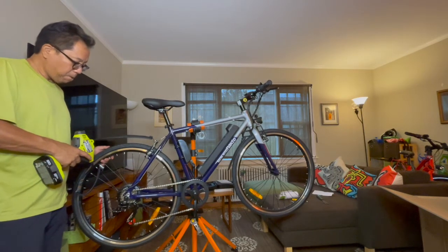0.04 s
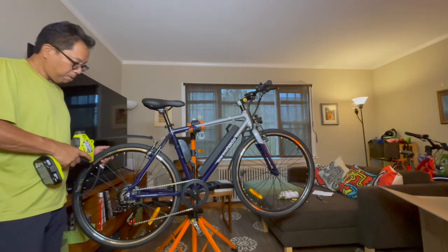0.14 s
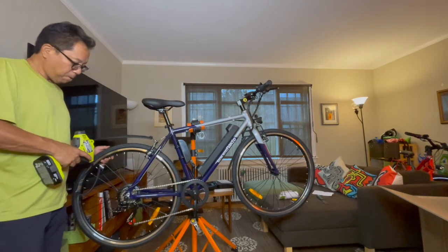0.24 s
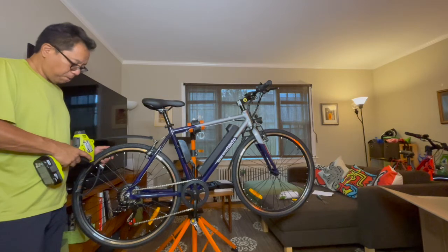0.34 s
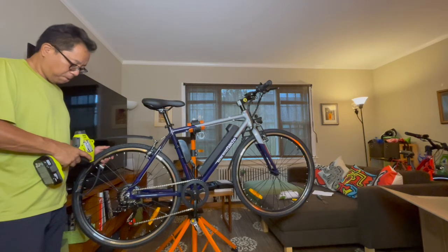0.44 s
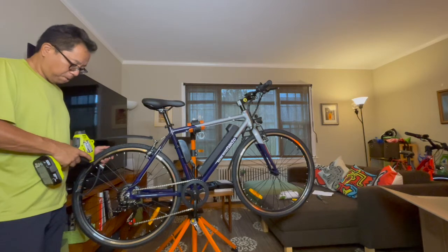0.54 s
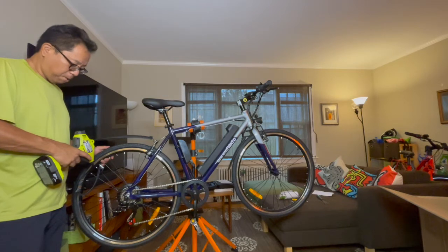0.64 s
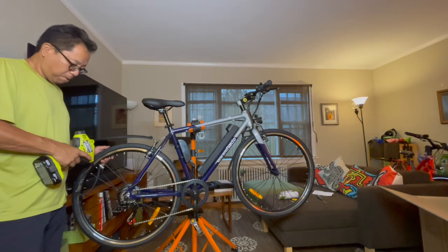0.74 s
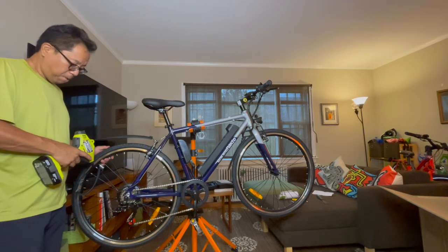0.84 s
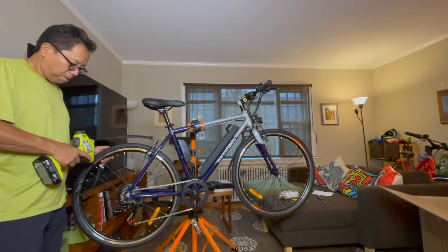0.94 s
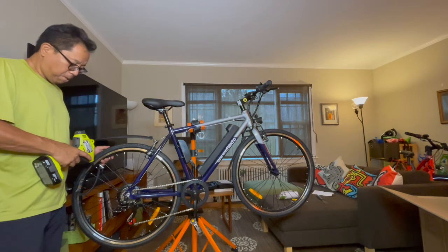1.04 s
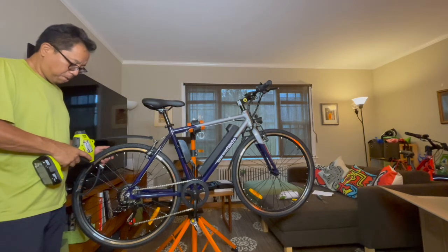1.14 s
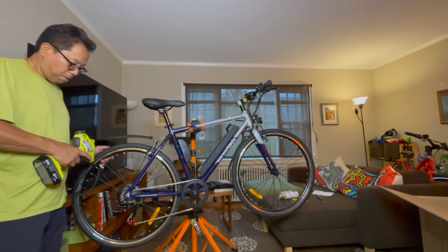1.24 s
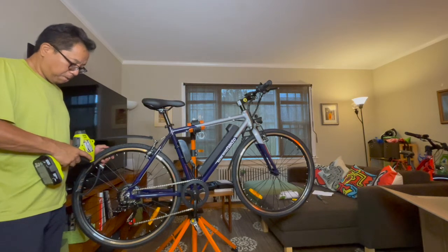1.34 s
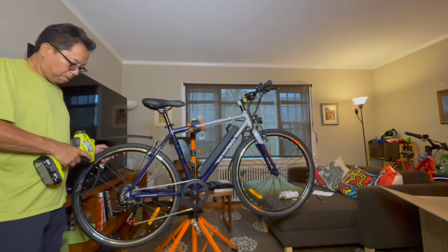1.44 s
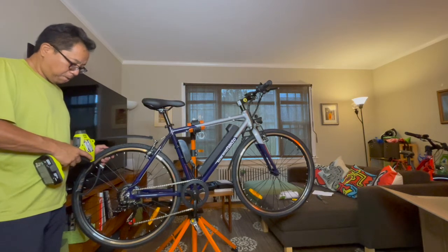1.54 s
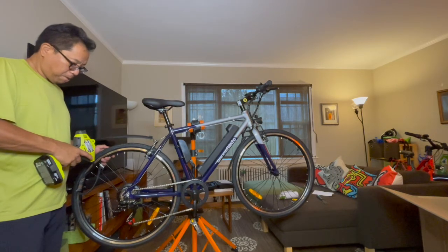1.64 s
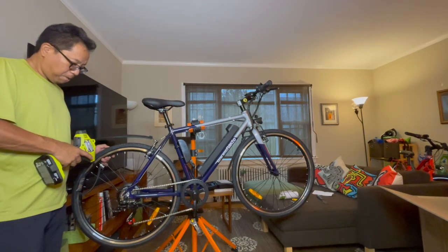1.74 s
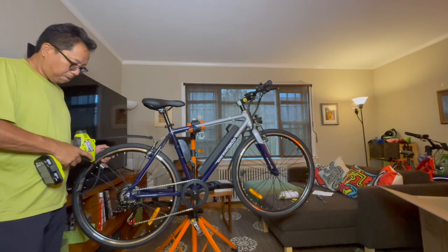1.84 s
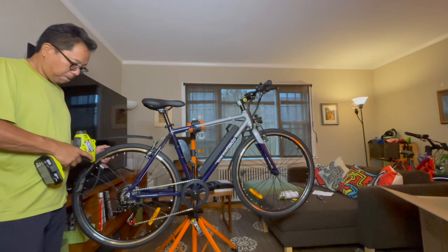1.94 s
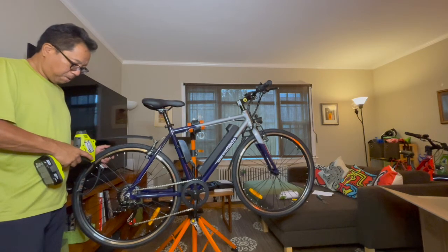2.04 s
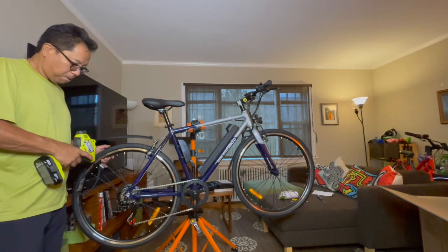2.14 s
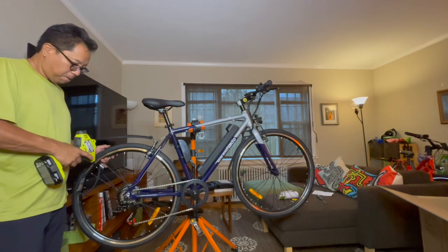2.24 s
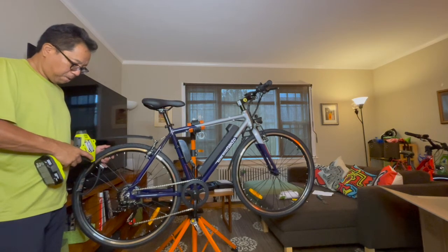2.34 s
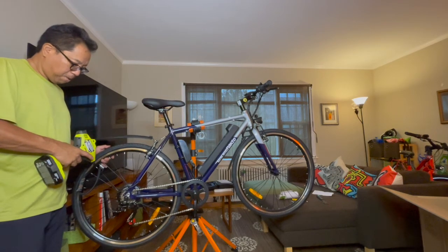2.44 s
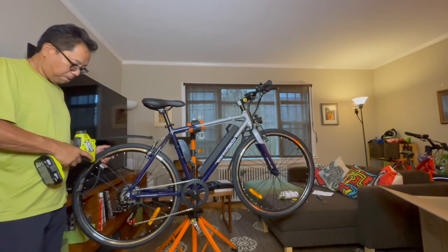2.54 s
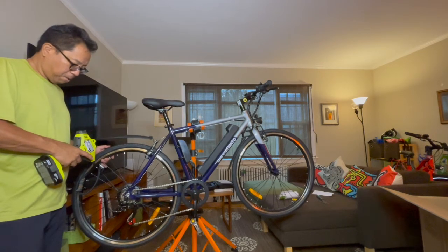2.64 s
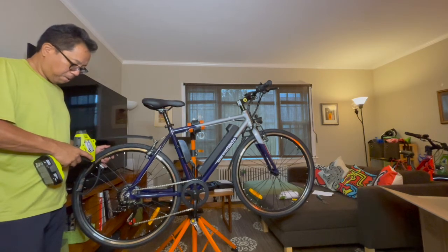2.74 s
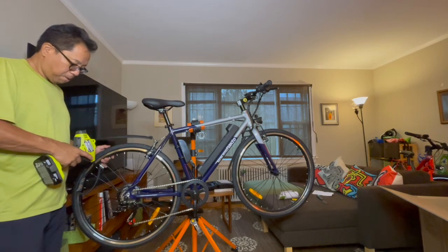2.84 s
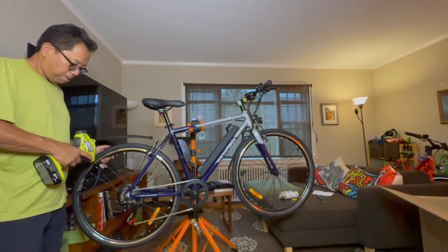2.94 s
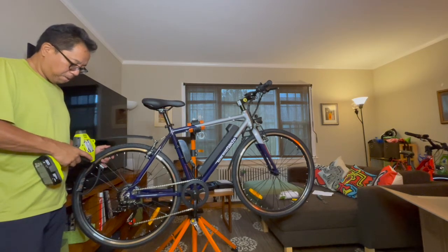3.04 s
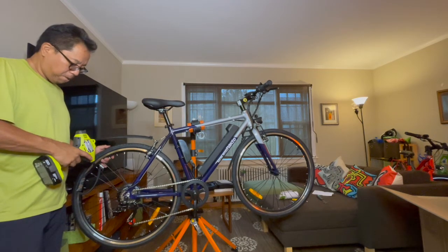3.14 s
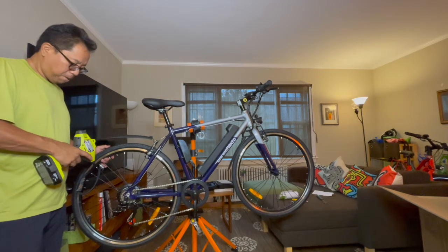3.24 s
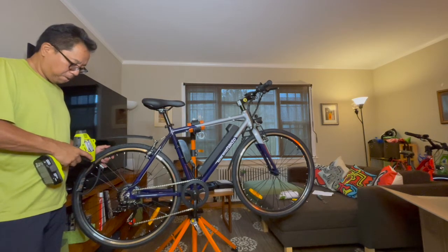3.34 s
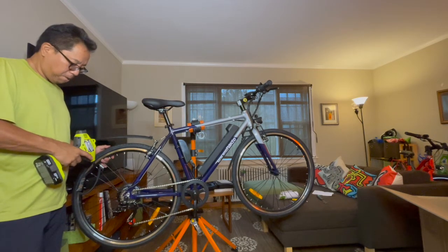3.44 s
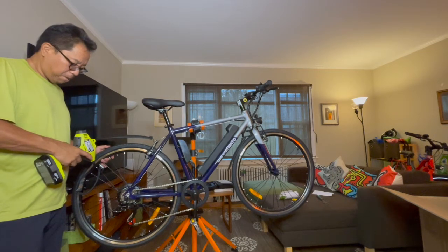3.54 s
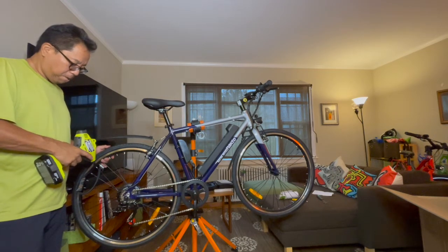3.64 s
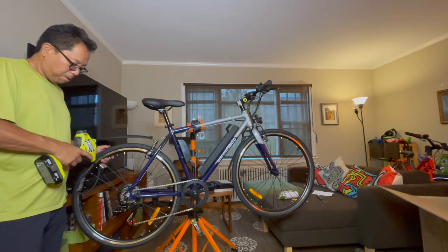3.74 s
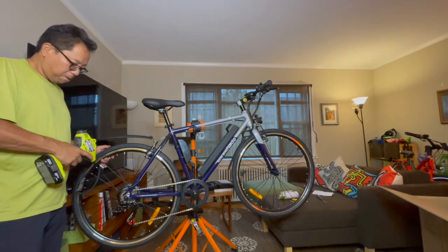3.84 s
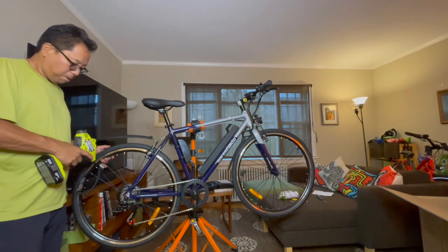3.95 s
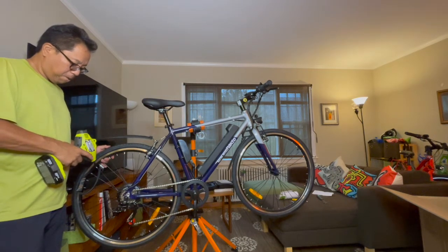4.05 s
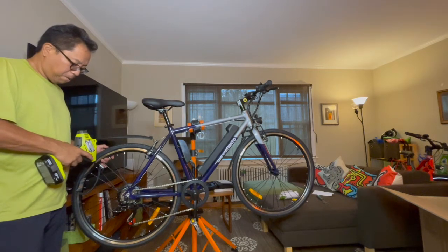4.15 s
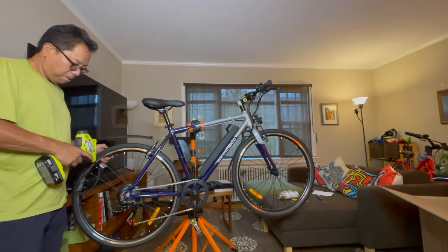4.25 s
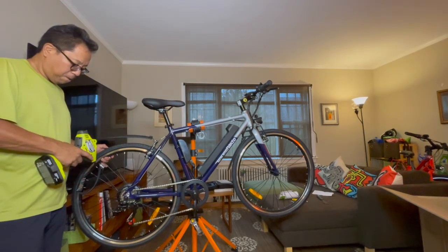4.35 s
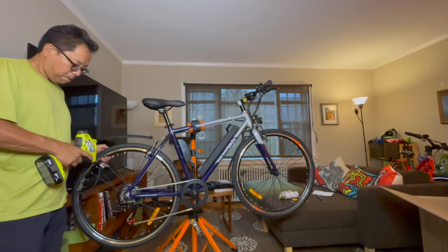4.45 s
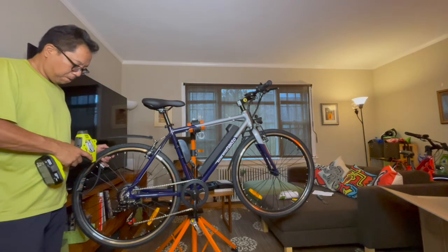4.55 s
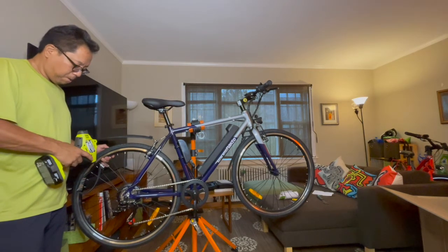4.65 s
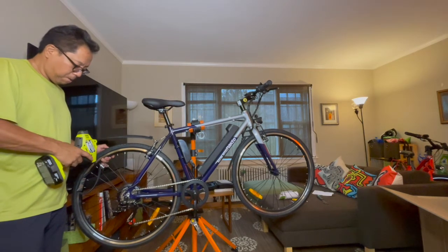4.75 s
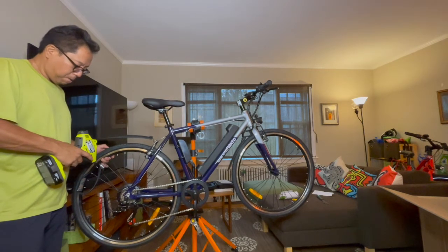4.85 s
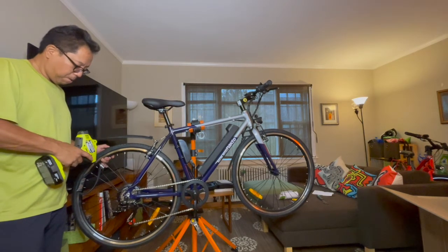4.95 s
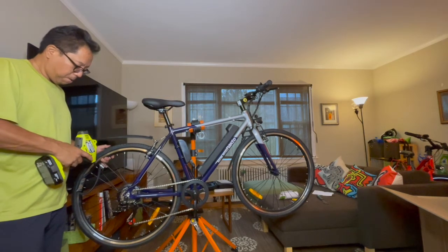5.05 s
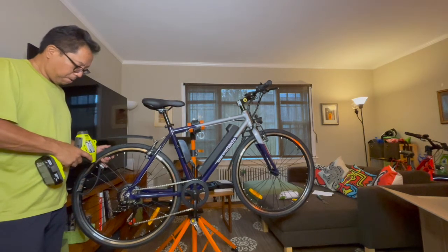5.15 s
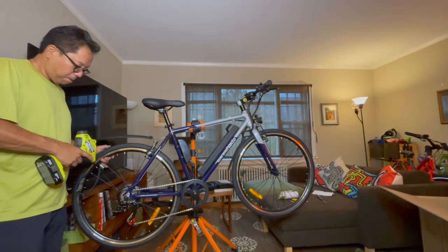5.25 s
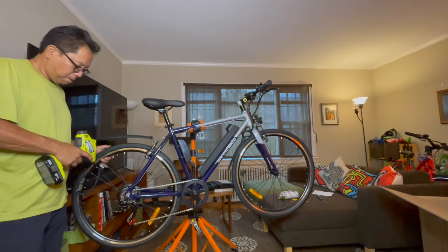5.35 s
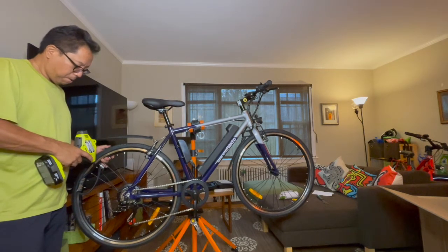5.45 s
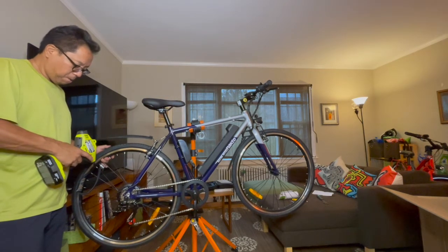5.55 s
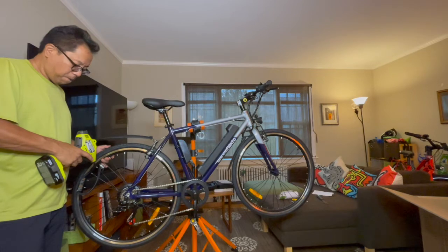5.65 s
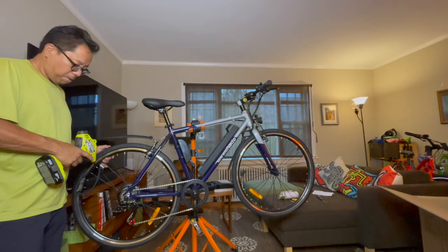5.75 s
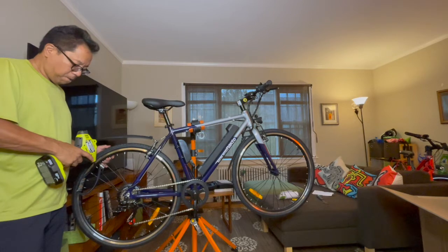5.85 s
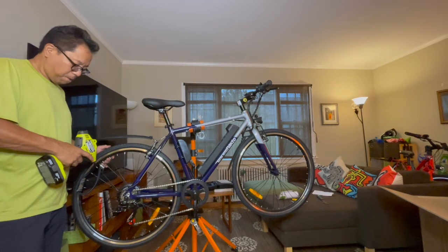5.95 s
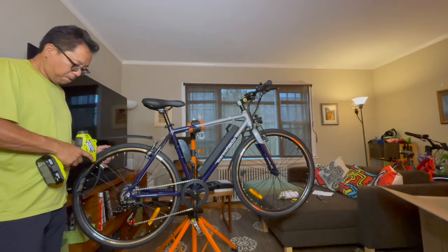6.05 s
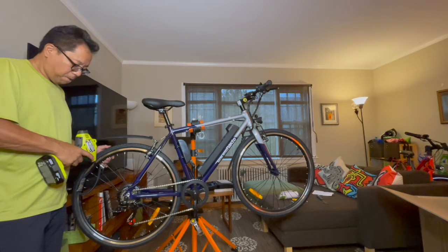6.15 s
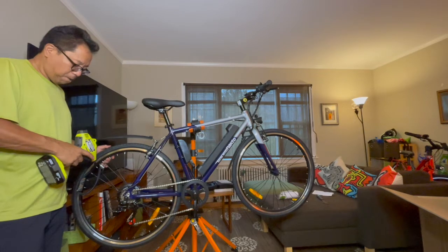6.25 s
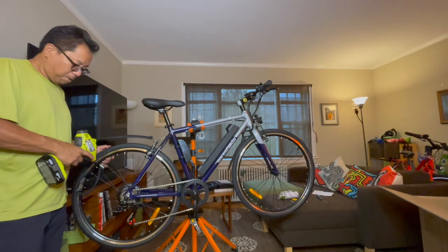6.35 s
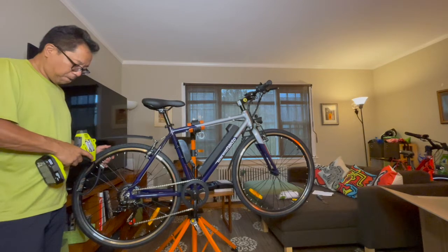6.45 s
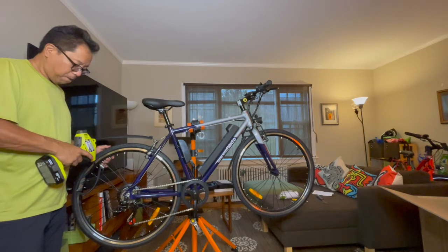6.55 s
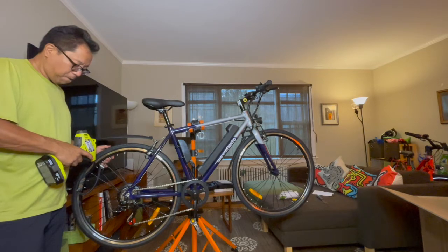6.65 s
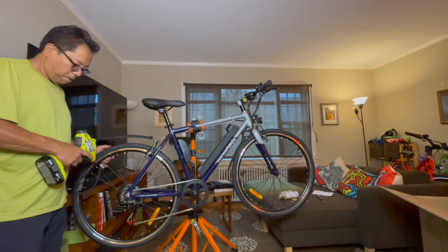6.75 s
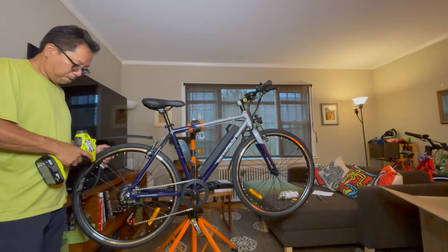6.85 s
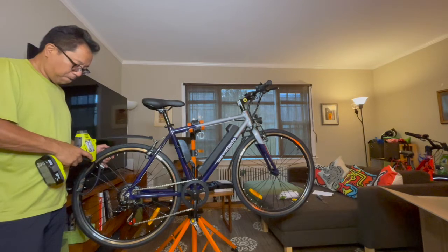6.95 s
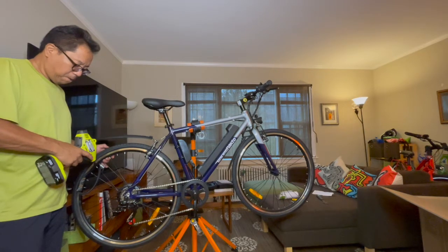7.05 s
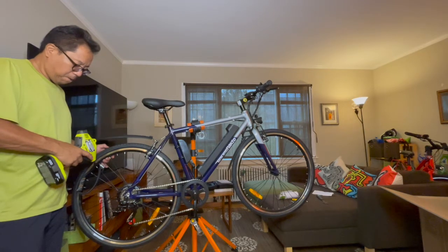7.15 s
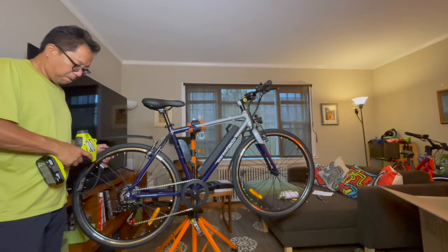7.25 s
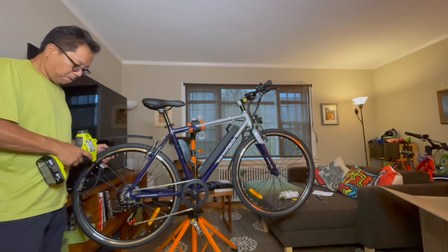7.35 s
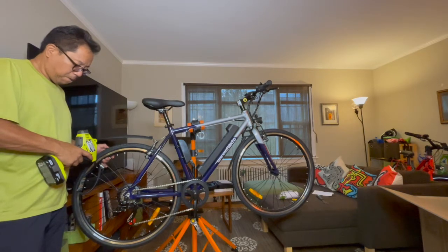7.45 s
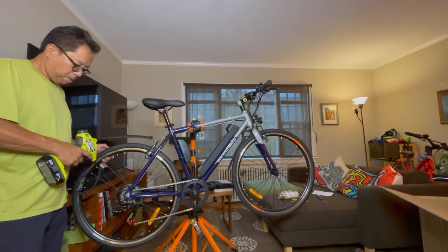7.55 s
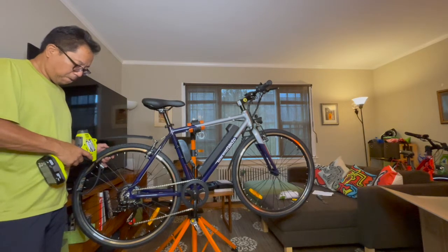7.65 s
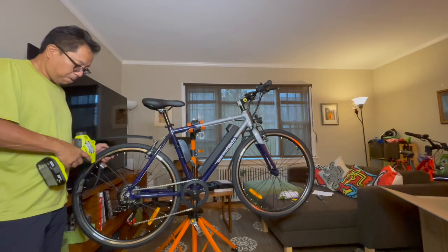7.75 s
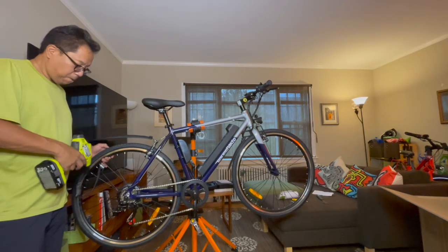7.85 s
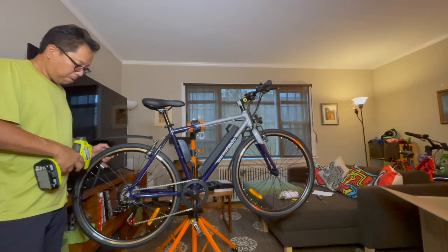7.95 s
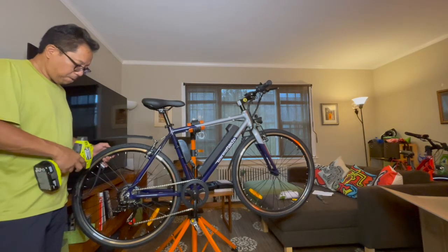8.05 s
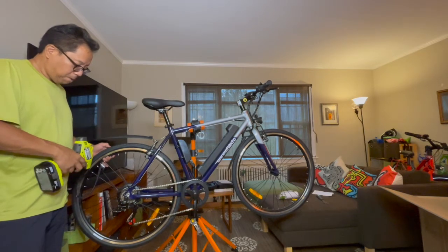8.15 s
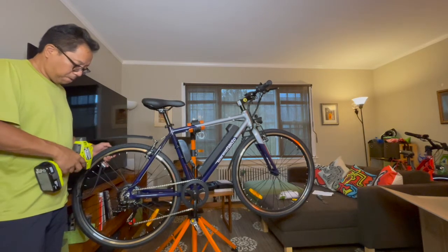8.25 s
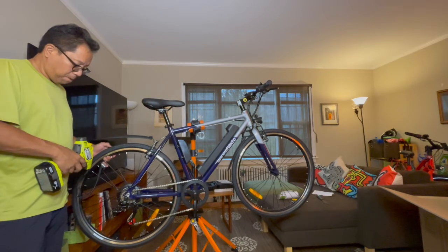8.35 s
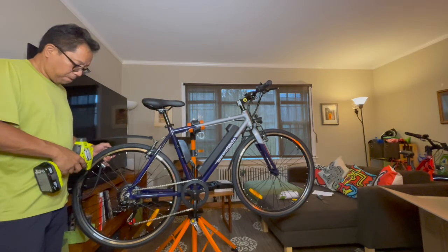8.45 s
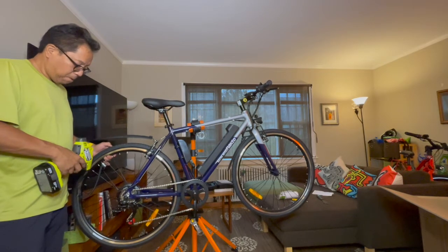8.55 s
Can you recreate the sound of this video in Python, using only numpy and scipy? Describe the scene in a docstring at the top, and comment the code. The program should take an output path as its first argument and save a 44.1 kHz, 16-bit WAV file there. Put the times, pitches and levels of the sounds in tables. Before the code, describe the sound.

From the very start, a hand-held cordless inflator is running, pumping air into a bicycle tyre, slightly left of the microphone in a furnished living room with a little short reverberation. Its small piston beats so fast that it forms a steady, pitched buzz, mixed with gear rattle, hissing air, bright valve chatter and fine rapid ticking. The loudness stays nearly even, while the pitch sinks very slightly as the tyre fills. At about 7.8 seconds the motor stops abruptly: the buzz dies at once, the rattle fades within a fraction of a second, and the mechanism stalls with a few quick, weakening knocks against its casing, over by about 8 seconds. A faint low room rumble lies underneath throughout and remains until the end, at around 8.7 seconds.

```python
"""A furnished living room: a hand-held piston inflator, slightly left, pumps a bicycle tyre.
The crank slows as the tyre fills; each turn gives a beat of tones, gear and air rattle, reed chatter
and a valve tick. At 7.8 s the trigger is let go and the crank stalls with a few knocks on the shell.
The room's low rumble runs throughout and is left at the end."""
import sys
import numpy as np
from scipy import signal
from scipy.fft import rfft, irfft, next_fast_len
from scipy.io import wavfile

SR = 44100
rng = np.random.default_rng(int(sys.argv[2]) if len(sys.argv) > 2 else 0)


def generate_wav(signal):
    """Clip the signal to [-1, 1] and save it as 16-bit WAV at the path in sys.argv[1]."""
    frames = np.transpose(np.atleast_2d(signal))
    scaled = np.clip(frames, -1, 1) * 32767
    pcm = np.round(scaled).astype(np.int16)
    wavfile.write(sys.argv[1], SR, pcm)


N = 379694
T = np.arange(N) / SR
HZ = np.maximum(np.fft.rfftfreq(N, 1 / SR), 1)


def amp(db):
    """dB to gain."""
    return 10 ** (np.asarray(db) / 20)


def unit_rms(x):
    """Scale to rms 1."""
    return x / np.sqrt(np.mean(x ** 2) + 1e-20)


def butter(x, hz, kind):
    """Butterworth filter, order 2."""
    return signal.sosfilt(signal.butter(2, hz, kind, fs=SR, output="sos"), x)


def in_time(rows):
    """Time curve at every sample."""
    return np.interp(T, *np.transpose(rows))


def at_hz(rows, hz=HZ):
    """Spectrum columns, interpolated over log f."""
    f, *columns = np.transpose(rows)
    return [np.interp(np.log(hz), np.log(f), c) for c in columns]


def drift(rate_hz, t=T):
    """Smooth random wander, spread about 1."""
    knots = rng.standard_normal(int(N / SR * 40) + 3)
    smooth = np.convolve(knots, [.5, .7, .5], "same")
    return np.interp(t * np.clip(rate_hz, .1, 39), np.arange(len(knots)), smooth)


def swell(turns, at_turn, width_turns, boost_db):
    """Gain with one Gaussian peak per turn."""
    away = (turns - at_turn + .5) % 1 - .5
    return amp(boost_db * np.exp(-.5 * (away / width_turns) ** 2))


# Stereo image: f/Hz, coherence/0-1, left over right/dB
IMAGE = [(39.3, 0.97, -2.5), (200, .95, -6.5), (535, 0.8, 3), (1230, 0.3, 5.5), (2120, 0.52, 0.5),
         (3160, 0.57, 5.5), (4500, 0.33, 3.5), (6000, 0.27, 9.5), (8920, 0.02, 2), (9910, 0.94, 0),
         (11150, 1, 2), (11300, 0, 9), (12500, 1, -6.5), (12600, 1, 0)]
# Interchannel phase: f/Hz, left lead/rad
LEFT_LEAD = [(60, .1), (150, .35), (300, .8), (520, 1.6), (1210, 1.6), (1980, 3.1), (3100, 4.9),
             (4570, 7.1), (6290, 10.1), (9100, 9.8), (9500, 9.4), (11000, 9.4), (12100, 4 * np.pi)]

def stereo(common, unrelated=None):
    """Spread a sound left and right; an unrelated signal lowers the coherence."""
    coherence, pan_db = at_hz(IMAGE)
    lead_rad = at_hz(LEFT_LEAD)[0]
    coherence = 1 if unrelated is None else np.clip(coherence, 0, 1)
    side = 0 if unrelated is None else np.sqrt(1 - coherence) * rfft(unrelated)
    mid = np.sqrt(1 + coherence) * rfft(common)
    pan = amp(pan_db / 2) * np.exp(.5j * lead_rad)
    return irfft(np.array([(mid + side) * pan, (mid - side) / pan]) / np.sqrt(2), N)


# Harmonics: f/crank rate
ORDERS = [1, *range(3, 26), 27, 28, 29, *range(48, 53), *range(83, 95)]
# Per order, before standing waves: left level/dB, right level/dB, left lead/rad
HARMONICS = [(-58, -55, 0.0), (-46.4, -44.5, 0.3), (-50.4, -48.6, 0.9), (-45.3, -49.0, 0.6),
             (-49.1, -43.8, 1.0), (-40.1, -39.9, 0.4), (-37.8, -35.7, 1.1), (-29.1, -34.7, 0.3),
             (-40.1, -36.6, -1.2), (-30.1, -34.5, 1.9), (-46.9, -50.6, -0.2), (-39.3, -46.7, 1.3),
             (-42.2, -39.7, 2.3), (-33.6, -50.8, 1.6), (-35.1, -47.9, -2.5), (-37.1, -43.7, 1.4),
             (-42.9, -36.9, 0.7), (-34.8, -40.0, 1.8), (-49.3, -47.2, 2.8), (-45.5, -45.9, 2.9),
             (-43.9, -42.4, 1.7), (-42.9, -49.6, 1.8), (-40.8, -43.1, 1.0), (-40.9, -48.4, 1.8),
             (-44.7, -49.1, 2.3), (-50.2, -56.4, -0.4), (-40.9, -44.2, 1.6), (-51.7, -50.3, 2.6),
             (-54.1, -55.8, 1.9), (-53.7, -53.7, 2.3), (-51.4, -52.5, 2.9), (-50.4, -56.5, -2.7),
             (-63.5, -64.0, -0.3), (-59.0, -57.4, 0.1), (-56.1, -58.9, 0.9), (-51.4, -59.1, 0.5),
             (-51.8, -58.4, 0.6), (-51.8, -55.4, 0.5), (-51.4, -55.7, 0.6), (-51.7, -57.5, 1.1),
             (-56.9, -60.7, 0.7), (-58.3, -65.0, 0.2), (-55.1, -59.2, -0.1), (-57.2, -61.5, 0.4)]
# Room modes: f/Hz, width/Hz, left boost/dB, right boost/dB
STANDING_WAVES = [(197.6, 2.0, -2.8, -9.8), (248.8, 4.0, 1.1, 9.1), (291.3, 5.0, 7.7, -10.8),
                  (342.2, 7.0, -20.0, -13.5), (387.6, 8.0, -20.0, -11.7), (396.9, 3.0, 0.9, -3.9),
                  (437.0, 9.0, -7.2, 1.8), (441.7, 9.0, -8.5, -3.3), (485.2, 7.6, -20.0, -3.2),
                  (492.3, 4.6, 9.3, 3.2), (537.2, 9.4, 1.0, 7.5), (545.5, 11.0, 3.1, -5.4),
                  (594.8, 4.6, 6.3, 12.0), (637.7, 5.5, -17.7, -3.9), (684.0, 14.0, -0.4, -20.0),
                  (733.3, 5.8, -2.4, 10.0), (744.8, 10.7, -8.5, 12.0), (786.6, 16.0, 1.3, -9.1),
                  (793.8, 9.6, 2.3, 12.0), (832.8, 16.0, -13.2, 0.4), (880.9, 8.9, 10.8, -9.2),
                  (896.1, 4.5, 8.3, -16.2), (915.7, 8.1, 7.7, 8.9), (930.5, 4.0, 3.6, 7.5),
                  (967.5, 4.0, 4.7, 14.0), (979.1, 18.0, 7.9, -16.8), (1023.7, 16.0, -17.6, -12.8),
                  (1069.2, 7.8, 12.0, 3.1), (1086.8, 16.0, -12.8, 0.0), (1137.8, 10.0, -12.5, -9.1),
                  (1168.0, 6.0, 9.1, 1.4), (1187.4, 13.8, -9.1, -17.4), (1212.4, 6.3, -13.9, -10.6),
                  (1235.3, 6.3, 3.7, -1.2), (1325.0, 10.4, -17.0, -9.1), (1355.0, 5.0, 14.0, 10.6),
                  (1387.8, 5.0, 5.7, 13.6), (1402.8, 5.0, 5.0, 3.4), (1418.1, 20.0, -10.1, 0.5),
                  (2366.5, 8.0, 14.0, 10.3), (2405.7, 13.2, 2.3, -14.2), (2422.6, 16.0, 9.0, 11.9),
                  (2446.2, 8.0, 7.2, 8.7), (2512.4, 8.0, 14.0, 7.6), (2548.5, 24.7, -5.1, 10.1),
                  (4037.1, 40.0, 8.8, 6.4), (4107.9, 29.8, 14.0, 5.6), (4172.0, 10.0, 4.4, 4.9),
                  (4197.0, 17.1, -0.1, 9.9), (4270.0, 40.0, 6.3, 3.4), (4307.8, 12.0, 10.8, 10.2),
                  (4342.8, 10.0, 3.4, 10.2), (4384.1, 13.5, 13.2, 5.4), (4448.1, 12.9, 6.6, 12.5),
                  (4513.8, 20.1, 9.5, 12.3), (4544.4, 10.0, 10.2, -0.0)]

def piston_tones(turns, crank_hz):
    """Pressure beat and reed ring: crank harmonics sliding down through the room's standing waves."""
    waver_db, waver_rad, smear_rad, scatter_rad = .7, .2, .2, .04
    reed_above_order, reed_opens_turn, reed_db = 60, .31, .5
    out, hold = 0, 64
    t, rate_hz = T[::hold], crank_hz[::hold]
    for k, (*pair_db, lead_rad) in zip(ORDERS, HARMONICS):
        level_db = np.c_[pair_db]
        stereo_rad = np.outer([.5, -.5], lead_rad + waver_rad * drift(.73, t))
        if k > reed_above_order:   # reed struck as it opens
            level_db = level_db + reed_db
            stroke_rad = -2 * np.pi * k * reed_opens_turn
        else:   # beat spread over the turn
            stroke_rad = smear_rad * k ** 2
        echo_rad = min(scatter_rad * k, 1) * drift(.22, t)
        phasor = amp(level_db + waver_db * drift(2.85, t))
        phasor = phasor * np.exp(1j * (stroke_rad + echo_rad + stereo_rad))
        for hz, width_hz, *boost_db in STANDING_WAVES:
            if abs(hz - k * rate_hz[0]) < 400:
                detune = 2 * (k * rate_hz - hz) / width_hz
                phasor *= 1 + (amp(np.c_[boost_db]) - 1) / (1 + 1j * detune)
        held = np.repeat(phasor, hold, axis=1)[:, :N]
        out = out + (held * np.exp(2j * np.pi * k * turns)).imag
    return out


# Repeating rattle spectrum: f/Hz, level/dB re random rattle
GEAR_SPECTRUM = [(1400, -2.5), (2500, -8.5), (3500, -8), (3950, -6), (4100, -13), (4500, -15), (4650, 1.5),
                 (5500, -6.5), (9000, -10.5)]

def gears(turns):
    """One pattern per turn, blurred by gear play; echoes favour some pitches."""
    play_turns, echo_db, echo_step_hz, floor_hz = .0016, 3, 18, 1450
    angle = (turns + play_turns * drift(9)) % 1
    flat_cycle = irfft(np.exp(2j * np.pi * rng.random(501)), 1001)
    pattern = unit_rms(np.interp(angle, np.arange(1001) / 1001, flat_cycle))
    ripple_db = np.interp(HZ / echo_step_hz, np.arange(2000), echo_db * rng.standard_normal(2000))
    return irfft(rfft(pattern) * amp(at_hz(GEAR_SPECTRUM)[0] + ripple_db) * (HZ > floor_hz), N)


def reed_chatter(turns, drive, band_hz=(3960, 5090)):
    """The reed valve chatters while air passes."""
    return butter(drive, band_hz, "band") * (swell(turns, .49, width_turns=.18, boost_db=5.2) - 1)


def valve_tick(turns, noise, above_hz=11000):
    """One short treble burst per turn."""
    return butter(noise, above_hz, "high") * (swell(turns, .57, width_turns=.028, boost_db=4.8) - 1)


# Gear and air noise: f/Hz, relative density/dB
RATTLE_SPECTRUM = [(120, -25.5), (300, -15.5), (600, -7), (1200, 0.5), (2000, -2), (3600, -2.5),
                   (5200, -10), (5600, -10), (6200, -2.5), (7000, -5), (7500, -16), (9000, -6),
                   (10400, -10.5), (12000, -11), (14500, -11.5), (15700, -15.5)]
# Shell resonances: f/Hz, width/Hz, boost/dB
SHELL_PEAKS = [(508, 180, 7), (946, 87, 3), (1570, 150, 2.5), (2040, 200, -1.5), (2417, 70, 4),
               (2890, 130, -1), (3860, 220, -3.5), (4313, 200, 3), (4220, 140, 1.5), (5105, 325, 9.5),
               (8000, 380, 9), (14700, 1800, 6)]

def shell(x):
    """Broad rattle spectrum plus the pump shell's resonances."""
    peaks_db = sum(db / (1 + (2 * (HZ - hz) / width_hz) ** 2) for hz, width_hz, db in SHELL_PEAKS)
    return irfft(rfft(x) * amp(at_hz(RATTLE_SPECTRUM)[0] + peaks_db), N)


# Rattle low shelf: t/s, level/dB
LOW_SHELF = [(0, 1.7), (2, .68), (4, .53), (6, -.39), (7.79, -2)]

def rattle(turns, shelf_hz=1400, uneven_db=.81):
    """Two unrelated signals of air, gears and valves, throbbing with the stroke."""
    throb = swell(turns, .6, width_turns=.24, boost_db=2.76)
    out = []
    for noise in rng.standard_normal((2, N)):
        repeating = gears(turns)
        valves = reed_chatter(turns, noise + repeating) + valve_tick(turns, noise)
        shelf = butter(noise, shelf_hz, "low") * (amp(in_time(LOW_SHELF)) - 1)
        uneven = amp(uneven_db * drift(29.99))
        out.append(shell((noise + shelf + repeating + valves) * uneven * throb))
    return np.array(out) / np.sqrt(np.mean(out[0] ** 2))


# House background: f/Hz, relative density/dB
RUMBLE_SPECTRUM = [(25, -38), (38, -12.5), (47, 5.5), (58, -12), (75, -13), (105, -14), (155, -19),
                   (420, -31), (710, -39.5), (2770, -62.5), (7500, -63), (12000, -72.5), (16000, -87)]

def rumble(rms_db=-48):
    """Steady low rumble and hiss of the house."""
    white = rng.standard_normal((2, N))
    coloured = irfft(rfft(white) * amp(at_hz(RUMBLE_SPECTRUM)[0]), N)
    return amp(rms_db) * unit_rms(stereo(*coloured))


# Room decay: f/Hz, t60/s
ROOM_T60 = [(150, 0.61), (1000, 0.46), (3000, 0.37), (8000, 0.13), (16000, 0.018)]

def room(x):
    """Reverberation from ten feedback delays a side; treble dies first."""
    size = next_fast_len(N + SR)
    hz = np.maximum(np.fft.rfftfreq(size, 1 / SR), 1)
    t60_s = at_hz(ROOM_T60, hz)[0]
    response = np.zeros((2, len(hz)), complex)
    for k, lag_s in enumerate(rng.uniform(.02, .055, 20)):
        echo = amp(-60 * lag_s / t60_s) * np.exp(-2j * np.pi * hz * lag_s)
        response[k % 2] += echo / (1 - echo) * (-1) ** (k // 2)
    return irfft(response * rfft(x, size), size)[:, :N]


# Stalling crank, then one faint knock: t/s, level/dB
STALL_HITS = [(7.799, -23.5), (7.819, -24), (7.845, -35), (7.879, -41.5), (7.911, -41), (7.989, -56),
              (8.442, -62.5)]
# Shell modes: f/Hz, level/dB re hit, t60/s
STALL_MODES = [(495, -3, 0.041), (883, -2.5, 0.023), (1430, -2, .035), (2120, -15.5, 0.034)]

def stall_knocks(spread_db=1.3, low_cut_hz=380):
    """Each knock rings every mode with its own strength; the knocks carry no bass."""
    onsets = [round(s * SR) for s, _ in STALL_HITS]
    hit_db = np.array(STALL_HITS)[:, 1]
    out = np.zeros(N)
    for hz, mode_db, t60_s in STALL_MODES:
        clicks = np.full(N, 1e-18)
        clicks[onsets] = amp(hit_db + mode_db + rng.normal(0, spread_db, len(onsets)))
        r, w = amp(-60 / (t60_s * SR)), 2 * np.pi * hz / SR
        out += signal.lfilter([0, np.sin(w)], [1, -2 * r * np.cos(w), r * r], clicks)
    return butter(out, low_cut_hz, "high")


# Crank speed before coasting: t/s, f/Hz
CRANK_RATE = [(0.0, 49.7), (0.78, 49.6), (4.96, 48.7), (7.75, 48.3)]
# Rattle before the release fade: t/s, level/dB
RATTLE_LEVEL = [(0.0, -29.5), (0.82, -30), (3.27, -30.5), (7.51, -30.5), (7.79, -29)]

def scene():
    """Pump, room and rumble; on release the tones die at once, the rattle ever faster."""
    release_s, coast_tau_s, room_db = 7.8, .25, -6
    tone_fade_db_s, rattle_fade_db_s, rattle_fade_db_s2 = 234.5, 93, 496
    off_s = np.maximum(T - release_s, 0)
    crank_hz = in_time(CRANK_RATE) * np.exp(-off_s / coast_tau_s)
    turns = np.cumsum(crank_hz) / SR
    clatter, knocks = rattle(turns), stall_knocks()
    fade_db = rattle_fade_db_s * off_s + rattle_fade_db_s2 * off_s ** 2
    clatter_gain = amp(in_time(RATTLE_LEVEL) - fade_db)
    tones = amp(-tone_fade_db_s * off_s) * piston_tones(turns, crank_hz)
    direct = tones + clatter_gain * stereo(*clatter) + stereo(knocks)
    reverb = amp(room_db) * room(clatter_gain * clatter[0] + knocks)
    return direct + reverb + rumble()


def record(dry):
    """Steep low-pass."""
    cutoff_hz = 15760
    return signal.sosfilt(signal.ellip(12, .5, 70, cutoff_hz, fs=SR, output="sos"), dry)


dry = scene()
out = record(dry)
generate_wav(out)
```